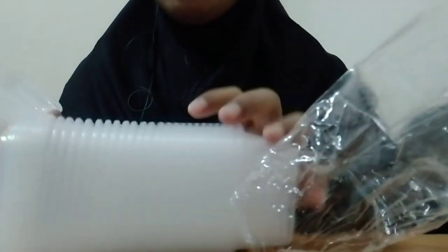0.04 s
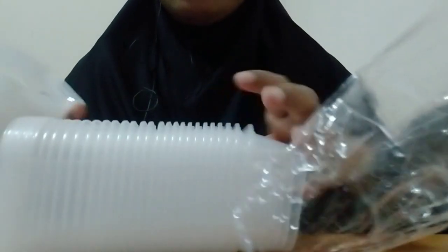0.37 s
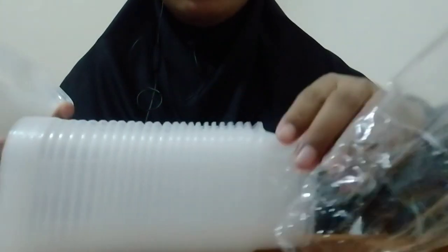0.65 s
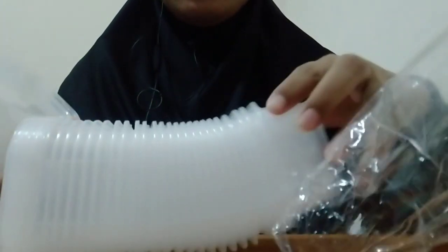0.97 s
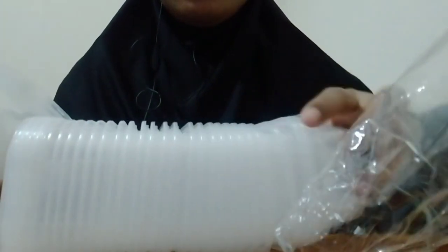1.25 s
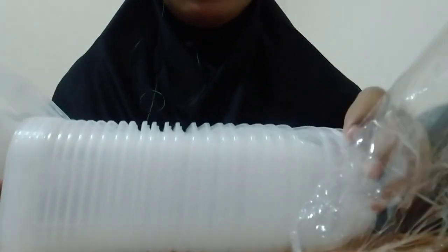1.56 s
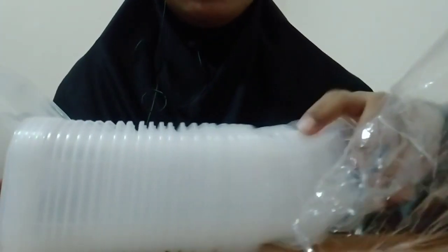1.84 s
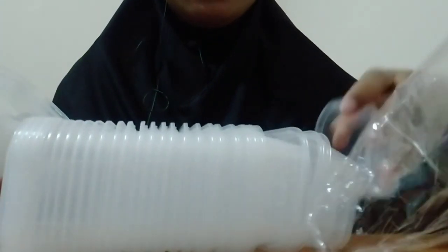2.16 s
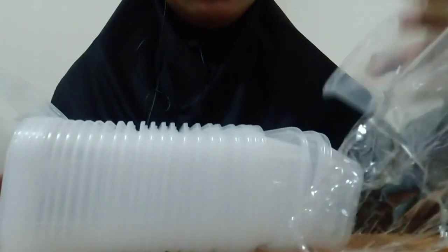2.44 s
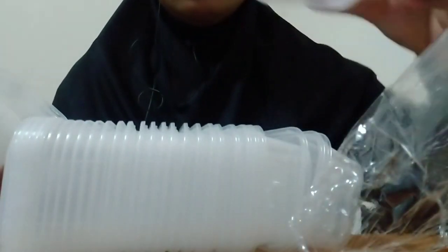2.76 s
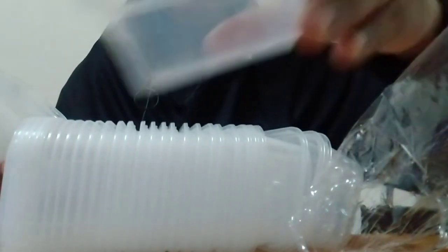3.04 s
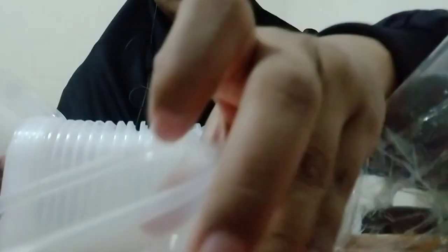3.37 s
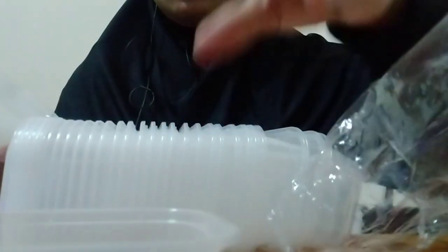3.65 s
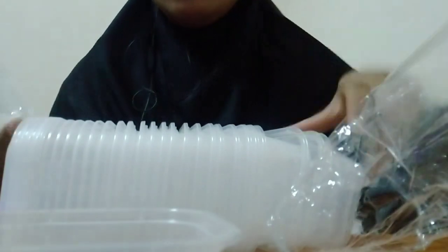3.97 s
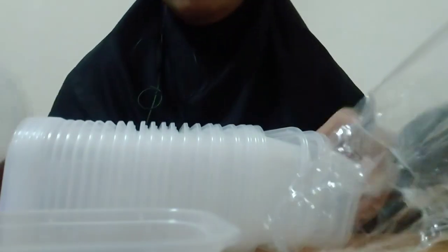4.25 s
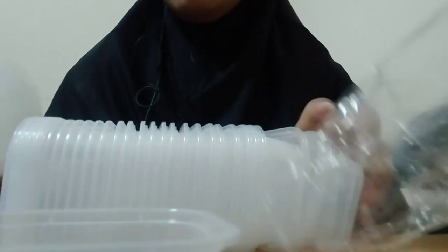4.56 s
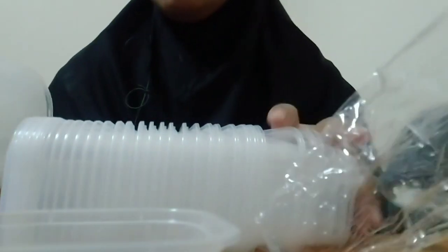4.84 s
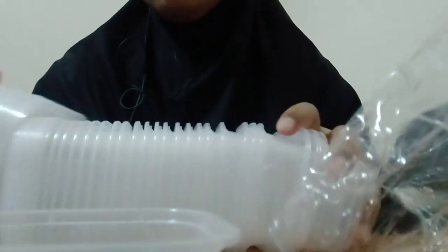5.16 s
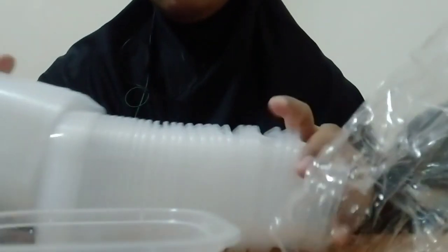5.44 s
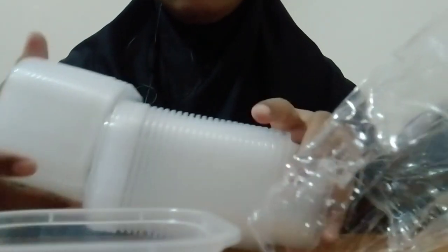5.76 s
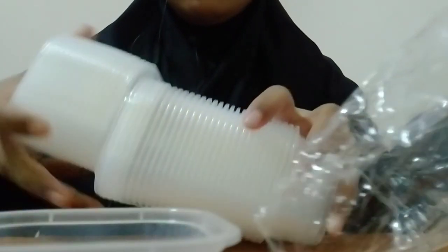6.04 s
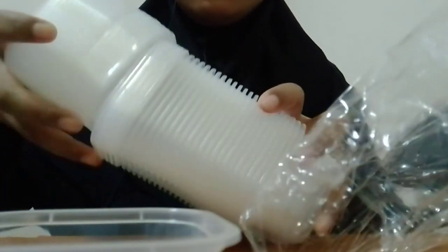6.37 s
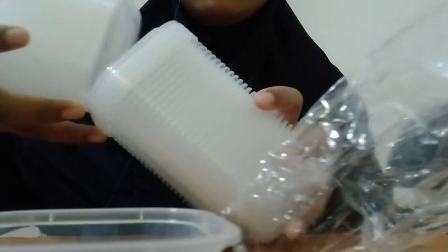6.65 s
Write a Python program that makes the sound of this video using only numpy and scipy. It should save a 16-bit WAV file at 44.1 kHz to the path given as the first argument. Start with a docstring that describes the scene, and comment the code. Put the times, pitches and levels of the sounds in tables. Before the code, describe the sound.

Close to the microphone, thin plastic containers scrape and bump as hands pull at the stack, with light crinkles and snaps from a plastic bag. A loud hollow knock follows, then a lid clatters briefly on the table. Later the rims catch and slip again in a cluster of knocks, ending with a couple of clicks as a tub comes free. A low hum runs underneath, and the small room rings briefly after each blow.

```python
"""A stack of thin plastic food containers is worked out of its bag on a table, close to the microphone.
The stack rings when knocked, and scrapes and shudders as the plastic catches and slips.
The bag crinkles and snaps as its creases flip, a lid is put down and rattles, and a tub clicks loose.
A small bare room rings after each blow, over a low steady hum."""
import sys
import numpy as np
from scipy import signal
from scipy.fft import rfft, irfft
from scipy.io import wavfile

SR = 44100
rng = np.random.default_rng(int(sys.argv[2]) if len(sys.argv) > 2 else 0)


def dump_mix(stems):
    """Bounce the given channels to the path in sys.argv[1] as a 16-bit WAV at rate SR."""
    frames = np.atleast_2d(stems).T  # one column per channel
    limited = np.clip(frames, -1, 1)  # hard clip at full scale
    pcm = np.round(limited * 32767).astype(np.int16)
    wavfile.write(sys.argv[1], SR, pcm)


N = 304731
T = np.arange(N) / SR
RING_T = T[:SR // 4]  # time axis for one short ringing sound

# Levels in the tables are relative: the functions may turn a whole group up or down.
# bands of the room's hum: f/Hz, width/Hz, level/dB
HUM_BANDS = [(70.6, 6, -71), (100.3, 10.6, -55), (122.4, 16, -49), (154.5, 6.9, -53), (185.5, 41, -49.5),
             (237.6, 11.3, -55.5), (261.5, 10.5, -56.5), (287.8, 15, -63)]
# hand movements on bag and stack, and the lid skittering on the table:
# t/s, length/s, crinkle level/dB, rubbing level/dB
MOVEMENTS = [(0.025, 0.29, -74, -52.5), (0.19, 0.17, -57, -46), (0.527, 1.75, -72.5, -51.5),
             (1.864, 0.24, -63.5, -47), (2.254, 1.8, -81, -55), (3.522, 0.066, -72, -34),
             (4.713, 0.58, -78, -54), (5.363, 0.17, -57, -40), (5.471, 0.19, -54, -43.5),
             (5.843, 0.11, -54, -42.5), (6.05, 0.86, -74.5, -50.5)]
# rims scraping over each other: t/s, length/s, level/dB, brightness f/Hz
SCRAPES = [(0.21, 0.049, -32.5, 1490), (0.259, 0.14, -43, 1500), (0.306, 0.053, -30.5, 2300),
           (1.135, 0.036, -43.5, 694), (1.53, 0.053, -36, 990), (1.9, 0.029, -40, 1100),
           (1.945, 0.14, -45, 2000), (3.652, 0.019, -29, 885), (5.434, 0.027, -37, 1590),
           (5.52, 0.0303, -29.5, 1010), (5.577, 0.0176, -28.5, 1474), (5.611, 0.088, -33, 930),
           (5.667, 0.027, -31, 1030), (5.857, 0.044, -30, 1000), (5.988, 0.019, -40, 2000),
           (6.131, 0.017, -40, 1240)]
# shudders of dragged plastic, one of them faint and longer: t/s, length/s, f/Hz, level/dB
LOW_TONES = [(.216, 0.0484, 155.4, -19), (1.545, 0.039, 161, -40), (3.219, 0.11, 237.2, -42),
             (5.39, 0.019, 160, -34), (5.586, 0.024, 192, -34), (5.875, 0.03, 143, -24),
             (5.903, 0.032, 131, -37), (6.697, 0.032, 143, -30.5)]
# the bag's loudest snaps: t/s, level/dB, crease f/Hz
SNAPS = [(0.264, -49, 5400), (0.311, -45, 3050), (0.345, -40.5, 3430), (0.902, -66, 5670),
         (1.128, -67, 4430), (1.306, -54, 7150), (1.415, -68, 6200), (1.535, -54, 6880), (1.738, -63, 6700),
         (1.896, -50.5, 6320), (1.917, -49, 7520), (2.006, -53, 3440), (2.053, -51, 3650),
         (2.076, -50.5, 3300), (2.273, -58, 3034), (3.029, -67.5, 4950), (3.322, -66, 5250),
         (3.4, -56, 6950), (3.419, -56.5, 4150), (3.446, -57, 3400), (3.484, -52, 3800),
         (3.59, -45.5, 5080), (4.955, -66, 3900), (5.038, -61.5, 2220), (5.146, -63, 3620),
         (5.433, -49.5, 2760), (5.451, -51.5, 6600), (5.4965, -41.5, 3460), (5.874, -46, 6050),
         (5.988, -50.5, 7100), (6.096, -58, 3830), (6.135, -57.5, 7100), (6.386, -64, 2750),
         (6.509, -66, 3380)]
# the bag sliding over the stack: t/s, length/s, level/dB, added crinkle level/dB
SWISHES = [(0.509, 0.087, -61.5, -7), (0.69, 0.23, -55, -21), (1.1, 0.083, -81, -15),
           (1.903, 0.23, -69, -18), (2.403, 0.075, -59, -1.5), (2.812, 0.041, -62, -4.5),
           (4.944, 0.04, -59, 3.5), (3.254, 0.21, -62.5, -7), (5.35, 0.052, -50, -14),
           (5.51, 0.15, -62, -4), (6.205, 0.077, -54, -7), (6.673, 0.091, -51, -6)]
# blows on stack, lid and end tub: t/s, body level/dB, wall level/dB, tick level/dB, favoured f/Hz
STACK_HITS = [(0.26, -30, -25, -61, 600), (0.319, -22, -26, -44.5, 640), (0.338, -33, -28.5, -44, 850),
              (1.72, -49, -32, -53, 815), (1.84, -59, -36.5, -48.5, 1160), (1.862, -36.5, -36.5, -60, 700),
              (1.982, -30.5, -34.5, -51, 870), (2.1975, -14, -16.5, -48, 774),
              (2.4965, -22.5, -20.5, -53, 640), (4.72, -66, -36.5, -57, 1120),
              (5.4965, -23.5, -20, -68, 1170), (5.505, -19, -31, -50, 816), (5.585, -33, -31, -61, 624),
              (5.667, -35, -26, -45.5, 543), (5.831, -39, -32, -50, 600), (5.867, -33, -50, -48, 690),
              (5.893, -35, -33, -41, 745)]
LID_HITS = [(3.508, -36, -10.5, -37, 1080), (3.5168, -24, -19, -61, 1050), (3.548, -33, -29, -72, 1090),
            (3.635, -30, -30, -42.5, 840), (3.6512, -30.5, -18, -33, 860), (3.67, -27.5, -46, -71, 660),
            (3.6945, -59, -20, -43.5, 666), (3.7195, -34.5, -27.5, -49.5, 740)]
TUB_HITS = [(5.3277, -50, -36, -53, 694), (5.342, -28, -31, -48.5, 1398), (6.2155, -27.5, -35, -46.5, 1430),
            (6.62, -32, -43, -59, 1310), (6.694, -24.5, -32.5, -50.5, 1280)]
# modes (the tones a thing rings with) of stack, lid and tub: f/Hz, level/dB, t60/s (time to fade 60 dB)
STACK_MODES = [(114, -28, 0.27), (173, 13, 0.069), (263.2, 12.5, 0.1), (315, -6.5, 0.13),
               (472, -7.5, 0.084), (540, -0.5, 0.031), (650, 1, .06), (695, 4, .065), (785, -1, .06),
               (1064, 3, .06), (1190, -3, .05), (985, 7, 0.016), (1317, -16.5, 0.12), (1560, -24, 0.016),
               (1980, 0, 0.11), (2180, 14, 0.012), (2360, 8.5, 0.012), (2860, 10, 0.024), (3530, -25, .02)]
LID_MODES = [(255, -10.5, 0.15), (320.5, -7.5, .13), (435, 2, 0.11), (671, 6, 0.023), (740, -5, 0.08),
             (785, -2, 0.044), (1059, -6, 0.14), (1188, -6, 0.088), (1496, -13, 0.12), (1532, -0.5, 0.051),
             (1670, 5.5, 0.012), (1863, 4.5, 0.02), (2235, -25, 0.024), (3760, -20, 0.012)]
TUB_MODES = [(162, 5, 0.035), (280, -9, 0.12), (561, 3.5, 0.047), (656, -3, 0.11), (830, -25, 0.047),
             (1185, -6, 0.048), (1478, 3.5, 0.032), (1536, -6, 0.042), (1750, -13, 0.05), (2194, 4, 0.018),
             (2580, -5, 0.026), (3070, -10, 0.05), (3450, 0.5, 0.021)]
# pitches of the bag's tiny creases: f/Hz
CREASE_PITCHES = [3200, 5200, 8300, 14000]
# tone colours (how strong each pitch is): f/Hz, level/dB
HISS_COLOUR = [(18, -79), (30, -51), (64, -20), (79, -15), (124, 4.5), (145, -24), (215, -13.5), (266, -10),
               (374, -25.5), (554, -22.5), (780, -27.5), (2120, -37.5), (4080, -52.5), (10800, -58),
               (16000, -57.5)]  # background hiss
TICK_COLOUR = [(1500, -38), (2800, 1.5), (3400, 5), (4100, -2.5), (5200, 2), (6500, -2), (7900, 3.5),
               (9500, -5), (11500, -11.5), (14000, -9), (16000, -3.5)]  # a sharp tick of plastic
RUB_COLOUR = [(150, -17), (300, 2), (650, 2), (1100, -2), (2000, -11), (3000, -17), (4200, -33),
              (8000, -34.5)]  # rubbing
RIM_COLOUR = [(70, -33.5), (150, 19.5), (300, -4), (420, 11.5), (680, 0), (1000, -6.5), (1600, 4),
              (2500, -11), (4000, -12.5), (8000, -1.5), (11000, -12), (16000, -3)]  # one slip of a rim
SHEET_COLOUR = [(300, -4), (700, 5.5), (1500, 3.5), (2600, -1.5), (3400, -11.5), (4300, -28), (8000, -17.5)]  # a shaken wall or bag
MIC_COLOUR = [(60, -4.5), (85, 0.5), (1000, -0.5), (2100, 0), (2750, -0.5), (3400, -1), (4100, -1.5),
              (5100, -1.5), (6500, -1), (7550, 1), (7900, -0.5), (8400, 4.5), (9200, 1.5), (10500, -2.5),
              (14500, 0), (15650, 3.5)]  # the microphone
# the room's echo: f/Hz, t60/s, level/dB
ROOM_ECHO = [(154, 0.42, -9.5), (357, 0.32, -8), (700, 0.58, -15.5), (1510, 0.48, -14.5),
             (3010, 0.3, -14.5), (7000, 0.31, -12.5), (15200, 0.13, -7)]


def undb(db):
    """Turn decibels into a factor to multiply by."""
    return 10 ** (np.asarray(db) / 20)


def unit(x):
    """Scale a sound to an average (rms) level of 1."""
    return x / np.sqrt(np.mean(x ** 2))


def add(out, start_s, x):
    """Mix x into out at the given time."""
    i = max(int(start_s * SR), 0)
    out[i:i + len(x)] += x[:len(out) - i]


def burst(x, db):
    """Set the average level of a short sound's first 20 ms."""
    return x * undb(db) / np.sqrt(np.mean(x[:SR // 50] ** 2))


def colour(x, points):
    """Filter a sound through a tone colour."""
    hz, db = np.transpose(points)
    size = 2048
    gain_db = np.interp(np.log(np.fft.rfftfreq(size, 1 / SR) + 1), np.log(hz), db)
    cepstrum = irfft(np.log(undb(gain_db)))
    # fold it so that the filter rings after a click, never before
    cepstrum[1:size // 2] *= 2
    cepstrum[size // 2 + 1:] = 0
    response = irfft(np.exp(rfft(cepstrum)))
    return signal.fftconvolve(x, response)[:len(x)]


def favour(rows, centre_hz, db_per_octave):
    """Weaken tones far from one pitch: the spot that is struck decides which ring most."""
    return [(hz, db - db_per_octave * np.abs(np.log2(hz / centre_hz)), *rest) for hz, db, *rest in rows]


def soften(x, hz, order):
    """Cut the treble: a soft contact wakes fewer high tones."""
    return signal.sosfilt(signal.butter(order, min(hz, SR / 3), fs=SR, output="sos"), x)


def cut_bass(x, hz, order=2):
    """Weaken everything below hz."""
    return signal.sosfilt(signal.butter(order, hz, "high", fs=SR, output="sos"), x)


def clicks(count, per_s, spread_db):
    """Random clicks, many small and a few large."""
    happens = rng.random(count) < per_s / SR
    size = np.minimum(rng.exponential(size=count), 4)
    sign = rng.choice([-1, 1], count)
    return happens * sign * undb(spread_db * size)


def fade(t60, t=RING_T):
    """A curve that falls by 60 dB in t60 seconds."""
    return np.exp(-np.log(1000) * t / t60)


def crack(t60, points, rise_s):
    """A crack of thin plastic: a puff of noise that swells quickly and dies fast."""
    envelope = (1 - np.exp(-RING_T / rise_s)) * fade(t60)
    return colour(rng.standard_normal(len(RING_T)) * envelope, points)


def ring(modes):
    """One blow starts all the fading tones together; their pitches shift a little with the grip."""
    shifts = 1 + .008 * rng.standard_normal(len(modes))
    return sum(undb(db) * fade(t60) * np.sin(2 * np.pi * hz * shift * RING_T)
               for shift, (hz, db, t60) in zip(shifts, modes))


def hum_and_hiss(hum_gain_db=-2, hiss_db=-55.5):
    """Narrow bands of low noise make a wavering hum, with a soft hiss above it."""
    f = np.fft.rfftfreq(N, 1 / SR)
    power = sum(undb(db) ** 2 / width / (1 + ((f - hz) / width * 2) ** 2) ** 2
                for hz, width, db in HUM_BANDS)
    hum = unit(irfft(rfft(rng.standard_normal(N)) * np.sqrt(power), N))
    hum_level = np.linalg.norm(undb([db + hum_gain_db for _, _, db in HUM_BANDS]))
    hiss = unit(cut_bass(colour(rng.standard_normal(N), HISS_COLOUR), 300))
    return hum_level * hum + undb(hiss_db) * hiss


def strength(start_s, length_s, rise_s=0.039, release_s=0.11):
    """How strong one movement is: it builds up, holds and dies away."""
    build_up = np.clip((T - start_s) / rise_s, 0, 1)
    return build_up * np.exp(-np.maximum(T - start_s - length_s, 0) / release_s)


def crinkles(per_s):
    """Tiny creases flip: one run of clicks for each crease pitch, each click ringing briefly."""
    ticks = [crack(.008, favour(TICK_COLOUR, hz, 5), rise_s=.0007) for hz in CREASE_PITCHES]
    return unit(sum(signal.fftconvolve(clicks(N, per_s, spread_db=4.4), tick)[:N] for tick in ticks))


def crinkle_and_rub(crinkle_gain_db=-2, rub_gain_db=-4.5):
    """The moving bag crinkles; the rubbing is fingers and bag on the stack, or the lid skittering."""
    crinkle_level, rub_level = sum(np.outer(undb([crinkle_db, rub_db]), strength(start, length))
                                   for start, length, crinkle_db, rub_db in MOVEMENTS)
    bag = crinkles(per_s=160)
    rubbing = unit(colour(clicks(N, per_s=2000, spread_db=1.3), RUB_COLOUR))
    return undb(crinkle_gain_db) * crinkle_level * bag + undb(rub_gain_db) * rub_level * rubbing


def rumble(db=-51):
    """While things move, small shifts of weight keep the stack's lowest tones ringing."""
    moving = np.minimum(sum(strength(start, length) for start, length, _, _ in MOVEMENTS), 1)
    nudges = clicks(N, per_s=300, spread_db=3.6)
    return undb(db) * moving * unit(signal.fftconvolve(nudges, ring(STACK_MODES[:4]))[:N])


def scrapes():
    """Rims catch and slip in a quick, uneven run of clicks; each click also rings the hollow stack."""
    out = np.zeros(N)
    for start, length, db, bright_hz in SCRAPES:
        count = int(length * SR)
        slips = clicks(count, per_s=1500, spread_db=3.1) * signal.windows.tukey(count, .4)
        rim = soften(colour(signal.unit_impulse(len(RING_T)), RIM_COLOUR), bright_hz, order=1)
        hollow = cut_bass(ring(favour(STACK_MODES, bright_hz / 2, 13.2)), 240)
        rasp = signal.fftconvolve(slips, burst(rim, 0) + burst(hollow, 0))
        rasp_level = np.sqrt(np.sum(rasp ** 2) / count + 1e-18)
        add(out, start, undb(db) * rasp / rasp_level)
    return out


def shudders():
    """Short low tones: dragged plastic shudders as it sticks and slips, once faintly and for longer."""
    out = np.zeros(N)
    for start, length, hz, db in LOW_TONES:
        t = T[:int(length * SR)]
        wobble = np.interp(t * hz, np.arange(20), rng.standard_normal(20))  # cycles vary in length
        phase = 2 * np.pi * np.cumsum(hz * (1 + 0.11 * wobble)) / SR
        wave = sum(size * np.sin(k * phase) for k, size in enumerate([1, 0.073, 0.094, 0.04], 1))
        add(out, start, undb(db) * unit(wave * signal.windows.tukey(len(t), .6)))
    return out


def blows(hits, modes, body_modes, focus_db_per_octave, body_gain_db, wall_gain_db, tick_gain_db,
          buzz_db, buzz_t60, tick_t60, body_cut_hz, wall_cut_hz):
    """Each blow rocks the whole body (the lowest modes), rings the walls and ticks where it lands."""
    out = np.zeros(N)
    for start, body_db, wall_db, tick_db, spot_hz in hits:
        tones = ring(favour(modes[body_modes:], spot_hz, focus_db_per_octave))
        buzz = crack(buzz_t60, favour(SHEET_COLOUR, spot_hz, focus_db_per_octave), rise_s=0.00049)
        walls = soften(burst(tones, 0) + burst(buzz, buzz_db), 3900, order=4)
        body = soften(ring(modes[:body_modes]), 630, order=2)
        tick = crack(tick_t60, TICK_COLOUR, rise_s=0.00019)
        # a small plastic shell hardly moves the air at low pitches
        add(out, start, burst(cut_bass(body, body_cut_hz), body_db + body_gain_db))
        add(out, start, burst(cut_bass(walls, wall_cut_hz), wall_db + wall_gain_db))
        add(out, start, burst(tick, tick_db + tick_gain_db))
    return out


def stack_knocks():
    """The knocked stack of containers rings with a low, hollow sound."""
    return blows(STACK_HITS, STACK_MODES, body_modes=4, focus_db_per_octave=13.5,
                 body_gain_db=-5.5, wall_gain_db=-5, tick_gain_db=0,
                 buzz_db=-3.5, buzz_t60=0.051, tick_t60=0.046, body_cut_hz=126, wall_cut_hz=362)


def stray_snaps(count=200, per_s=9, above_crinkle_db=1.5, spread_db=3, low_hz=2840, high_hz=6800):
    """List faint snaps at random times during movements, louder when the bag crinkles harder."""
    wait, size, pitch = rng.random((count, 3)).T
    times = np.cumsum(-np.log(1 - wait)) / per_s
    extra_dbs = above_crinkle_db + spread_db * (2 * size - 1)
    pitches = low_hz * (high_hz / low_hz) ** pitch
    return [(t, crinkle_db + extra_db, hz) for t, extra_db, hz in zip(times, extra_dbs, pitches)
            for start, length, crinkle_db, _ in MOVEMENTS if start < t < start + length]


def bag_snaps(snaps, rise_s=.002, ping_t60=0.02, tick_t60=0.033, sheet_t60=0.028):
    """A crease flips with a tick, pings at its own pitch and shakes the bag around it."""
    out = np.zeros(N)
    for start, db, crease_hz in snaps:
        # the two sides of a crease ring at nearby pitches
        ping = ring([(crease_hz * 0.87, 0, ping_t60), (crease_hz * 1.05, 0, ping_t60)])
        ping *= 1 - np.exp(-RING_T / rise_s)
        tick = crack(tick_t60, favour(TICK_COLOUR, crease_hz, 6), rise_s)
        sheet = crack(sheet_t60, favour(SHEET_COLOUR, crease_hz, 6), rise_s)
        # a wide crease rings lower and shakes more of the bag
        sheet_db = db + 2 - 2.5 * np.log2(crease_hz / 3240)
        add(out, start, burst(ping, db - 6) + burst(tick, db - 3) + burst(sheet, sheet_db))
    return out


def swishes():
    """The sliding bag makes a soft swell of packed clicks, with a few bright crinkles on top."""
    out = np.zeros(N)
    slide = unit(colour(clicks(N, per_s=4800, spread_db=2.2), favour(SHEET_COLOUR, 3070, 5.1)))
    crinkle = crinkles(per_s=140)
    for start, length, db, crinkle_db in SWISHES:
        part = slice(int(start * SR), int(start * SR) + int(length * SR))
        swish = slide[part] + undb(crinkle_db) * crinkle[part]
        add(out, start, undb(db) * swish * signal.windows.tukey(len(swish), .7))
    return out


def lid_rattle():
    """The lid lands on the table and rattles, ringing each time it touches."""
    return blows(LID_HITS, LID_MODES, body_modes=2, focus_db_per_octave=11.5,
                 body_gain_db=-2, wall_gain_db=-4.5, tick_gain_db=-3,
                 buzz_db=-7.5, buzz_t60=0.065, tick_t60=0.026, body_cut_hz=238, wall_cut_hz=543)


def tub_clicks():
    """The end tub clicks loose from the stack and its thin walls ring briefly."""
    return blows(TUB_HITS, TUB_MODES, body_modes=2, focus_db_per_octave=5,
                 body_gain_db=-12.5, wall_gain_db=-1, tick_gain_db=1.5,
                 buzz_db=-6, buzz_t60=0.035, tick_t60=0.021, body_cut_hz=128, wall_cut_hz=450)


def room_echo(x, gap_s=0.014, build_s=0.0019):
    """Bare walls send back a blur of echoes that dies sooner in the treble."""
    t = T[:SR]
    band_hz, t60s, levels_db = np.transpose(ROOM_ECHO)
    spectrum = rfft(rng.standard_normal(SR))
    log_hz = np.log(np.arange(SR // 2 + 1) + 1)
    onset = 1 - np.exp(-np.maximum(t - gap_s, 0) / build_s)
    tail = 0
    for this_band, t60, db in zip(np.eye(len(band_hz)), t60s, levels_db):
        noise = irfft(spectrum * np.interp(log_hz, np.log(band_hz), this_band))
        envelope = onset * fade(t60, t)
        tail = tail + undb(db) * noise * envelope / np.linalg.norm(envelope)
    return signal.fftconvolve(x, tail)[:N]


def scene():
    """Stack, tub, lid and bag close to the microphone, with the room and its hum behind them."""
    background = hum_and_hiss()
    near = stack_knocks() + tub_clicks() + lid_rattle()
    near += swishes() + crinkle_and_rub() + scrapes() + shudders()
    near += bag_snaps(SNAPS + stray_snaps()) + rumble()
    return (near + room_echo(near) + background)[None]


def record(dry, top_hz=15800):
    """A small microphone colours the sound and loses deep bass; the recorder rounds peaks, cuts highs."""
    thin = cut_bass(colour(dry[0], MIC_COLOUR), 70, order=4)
    rounded = 2 * np.tanh(thin / 2)
    treble_cut = signal.ellip(10, .2, 70, top_hz, fs=SR, output="sos")
    return signal.sosfilt(treble_cut, rounded)[None]


dry = scene()
out = record(dry)
dump_mix(out)
```